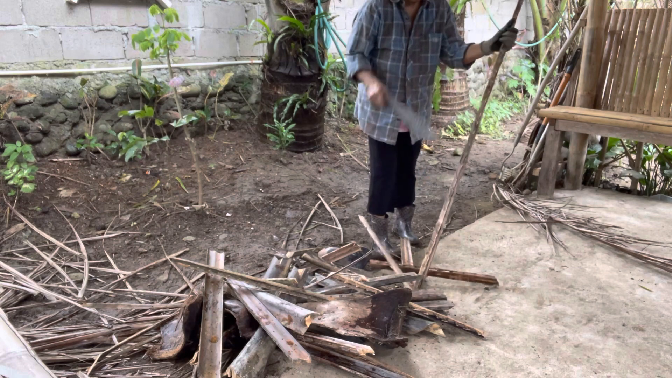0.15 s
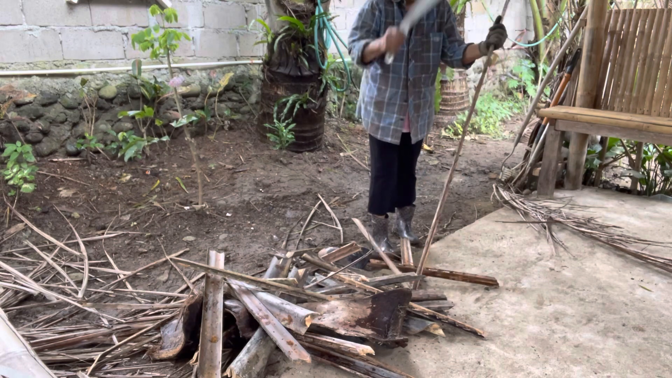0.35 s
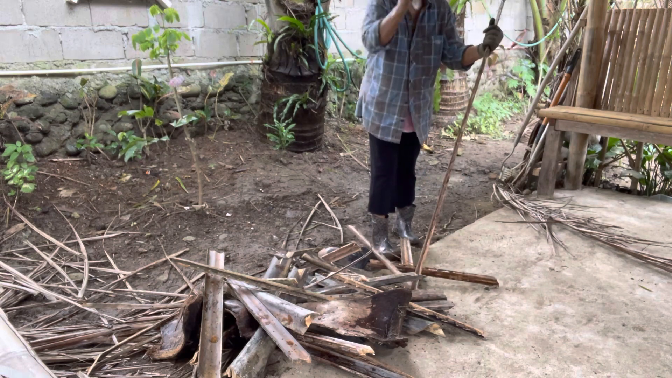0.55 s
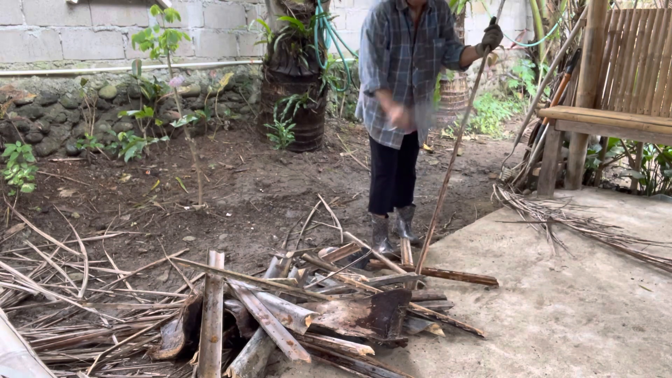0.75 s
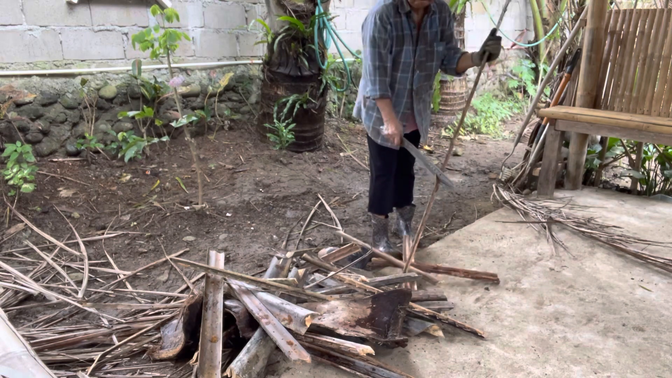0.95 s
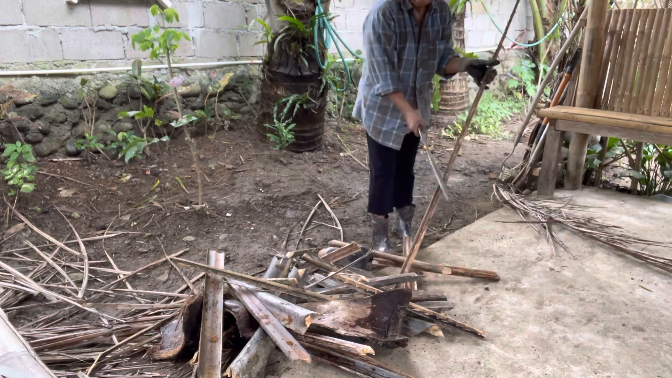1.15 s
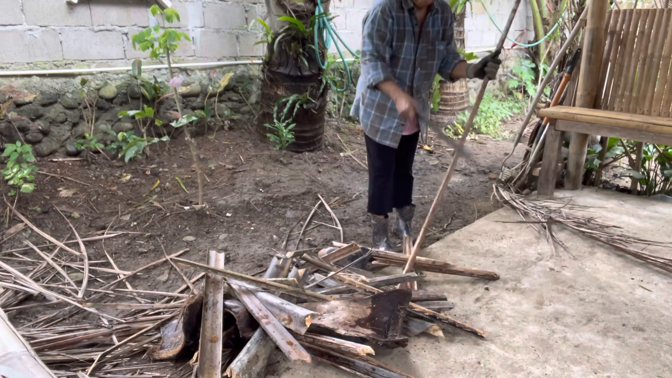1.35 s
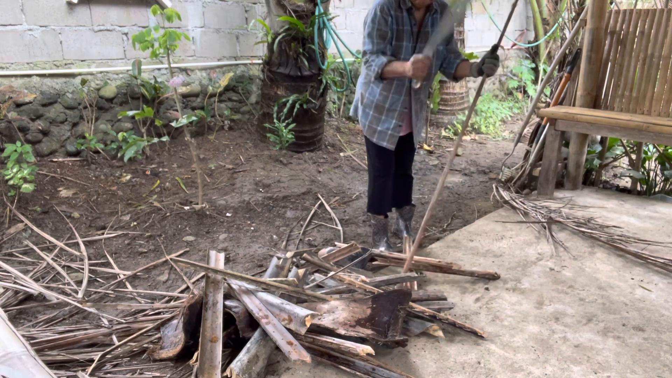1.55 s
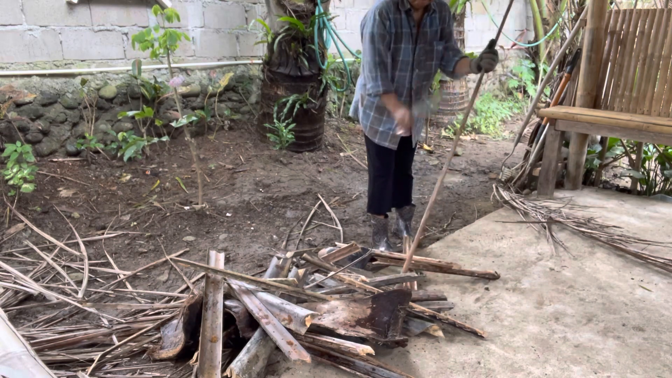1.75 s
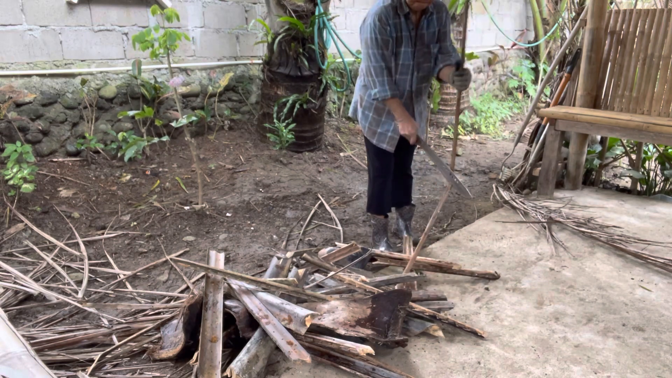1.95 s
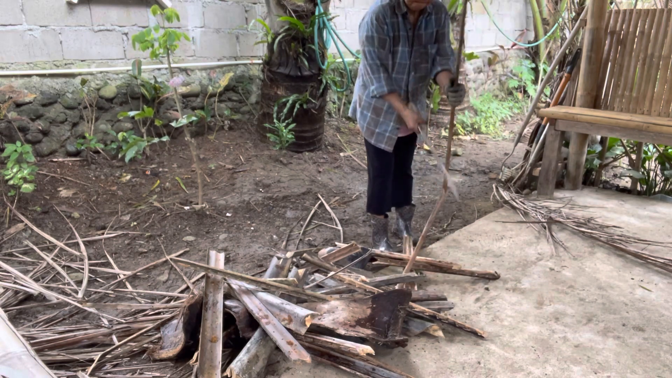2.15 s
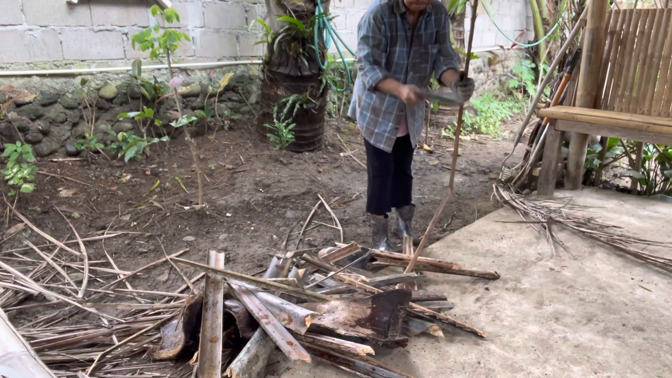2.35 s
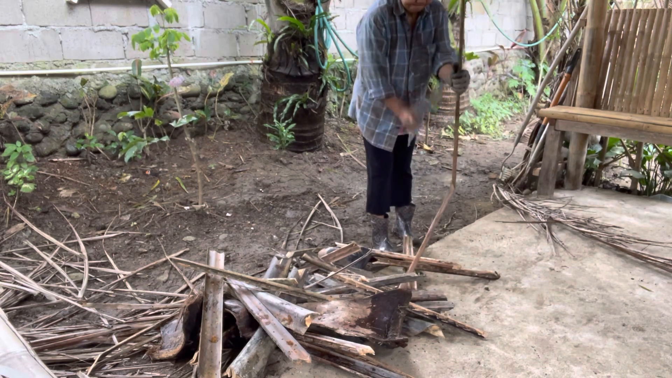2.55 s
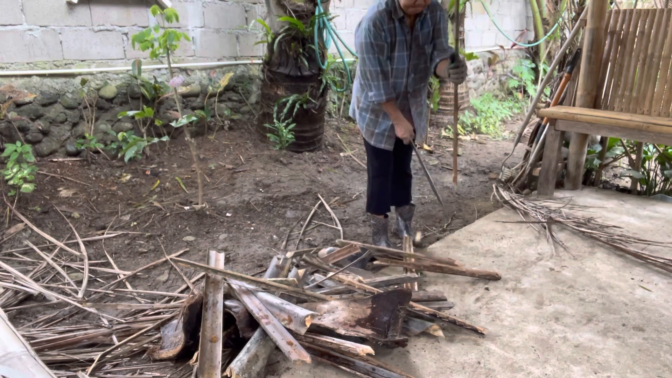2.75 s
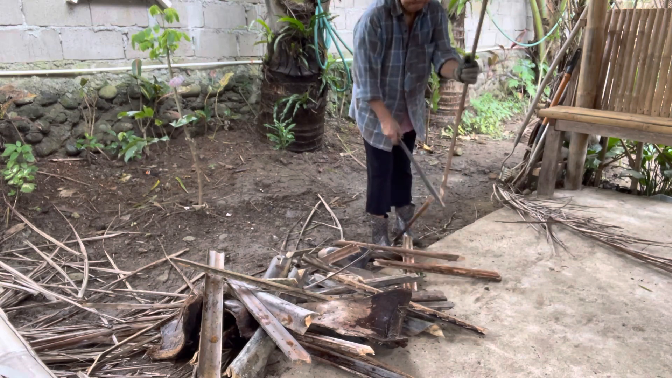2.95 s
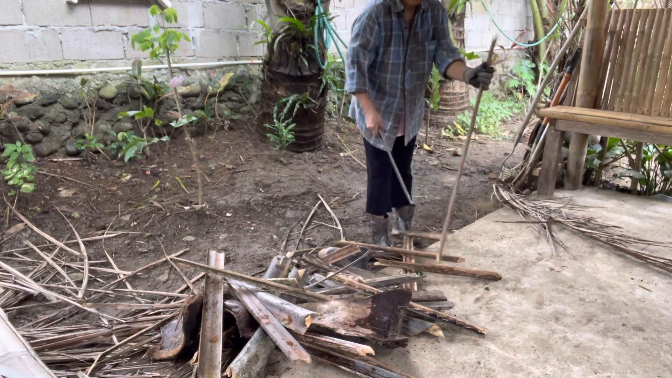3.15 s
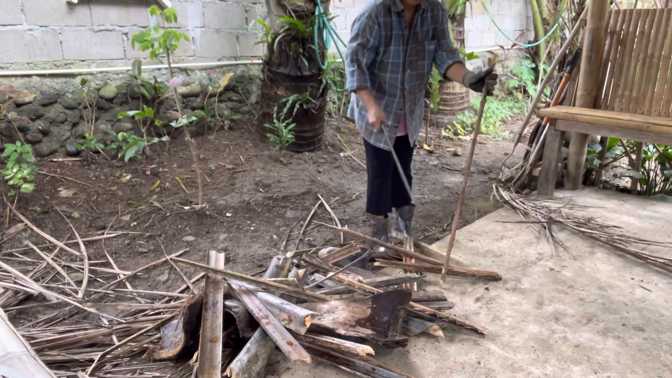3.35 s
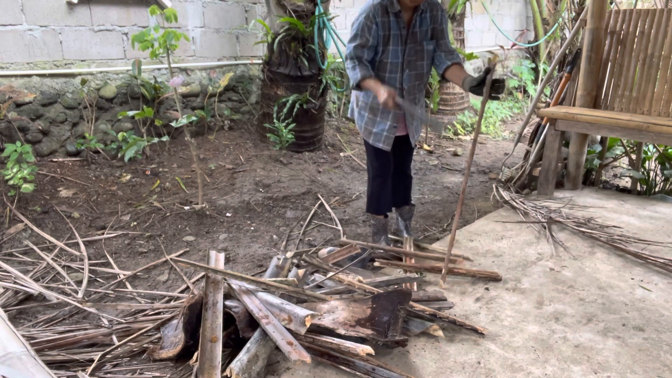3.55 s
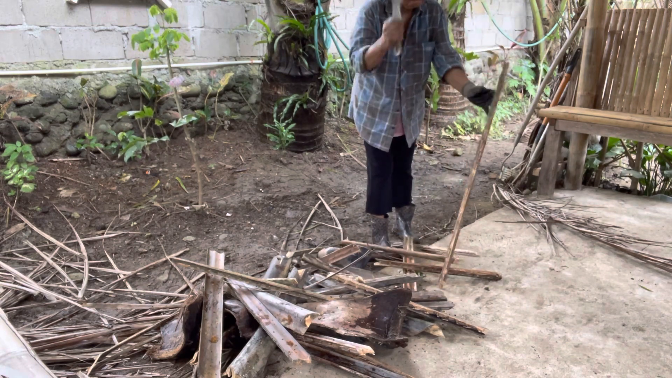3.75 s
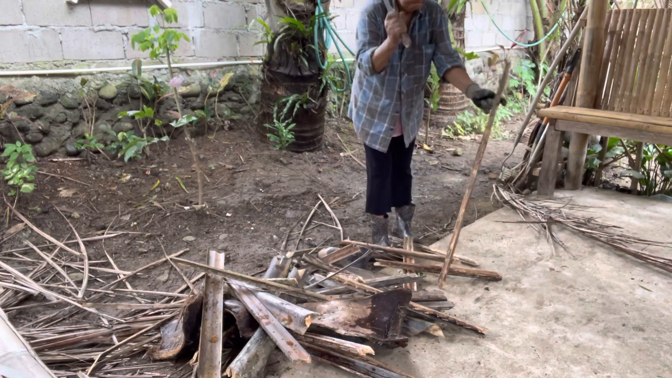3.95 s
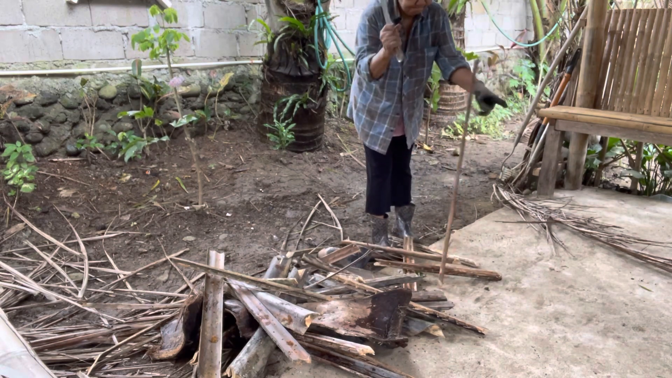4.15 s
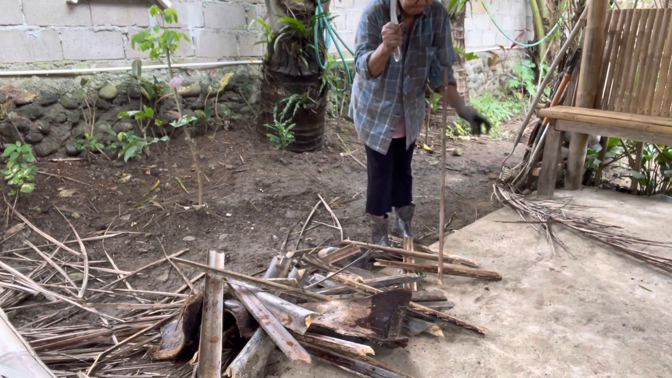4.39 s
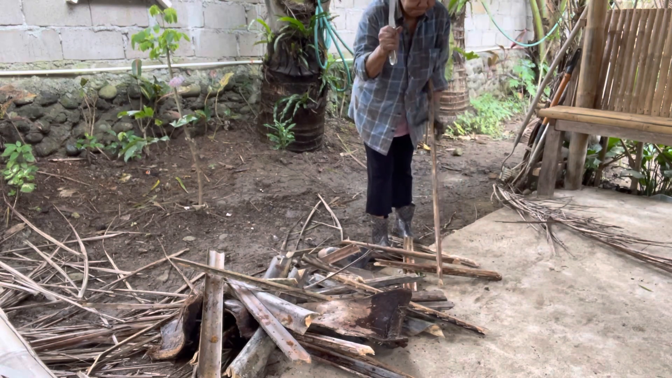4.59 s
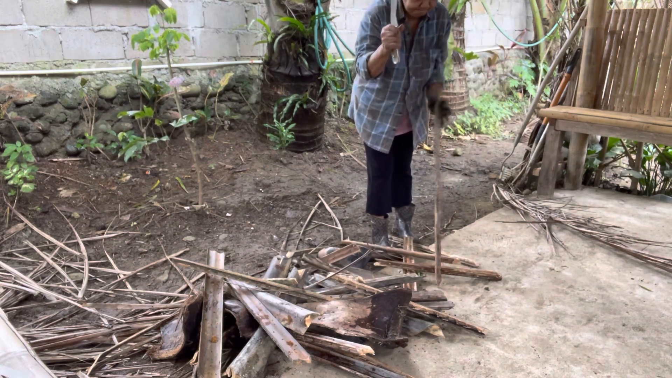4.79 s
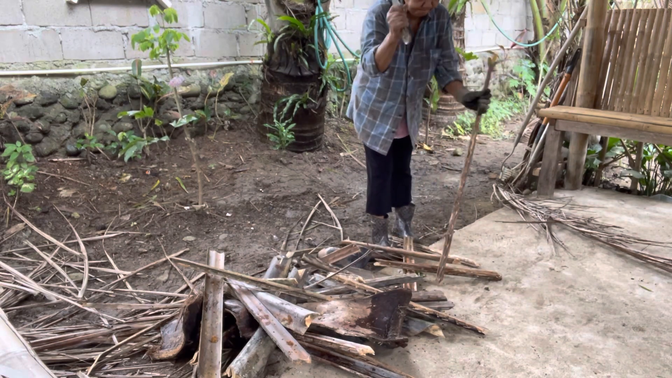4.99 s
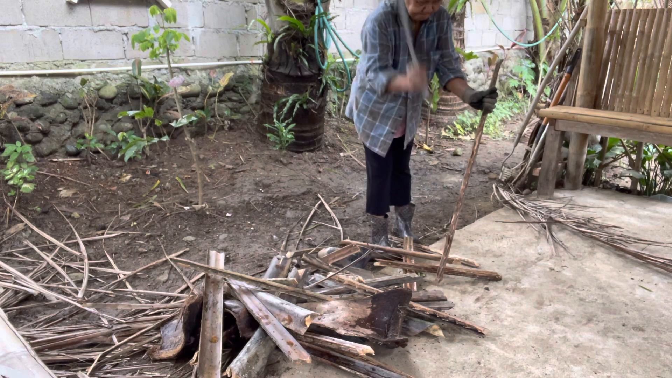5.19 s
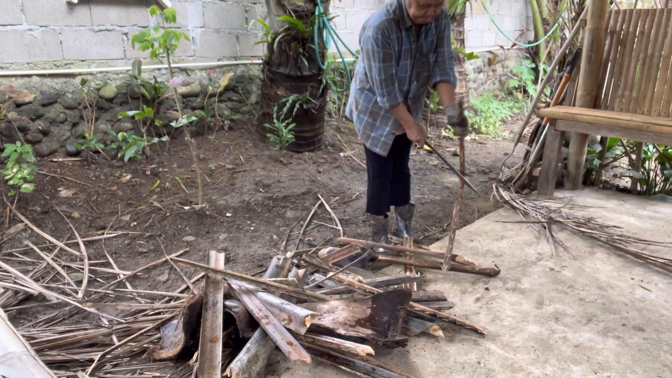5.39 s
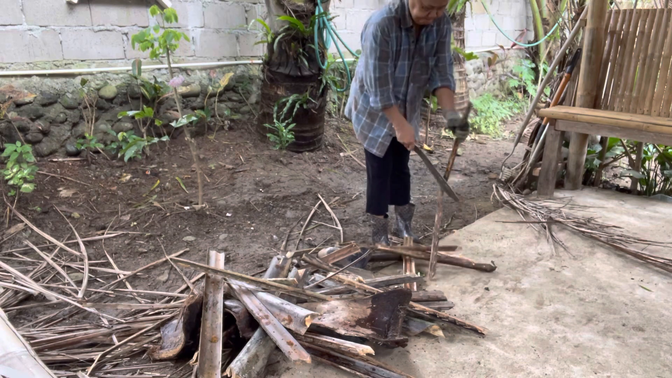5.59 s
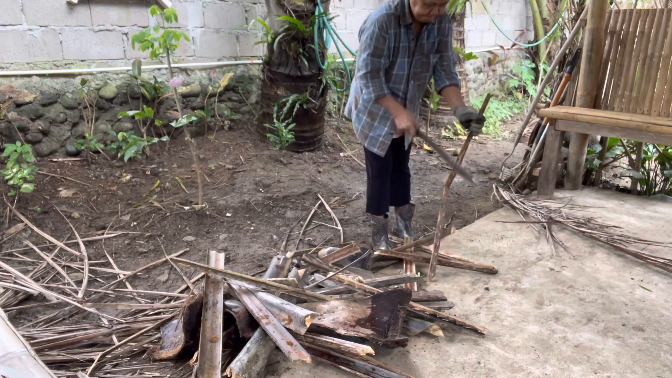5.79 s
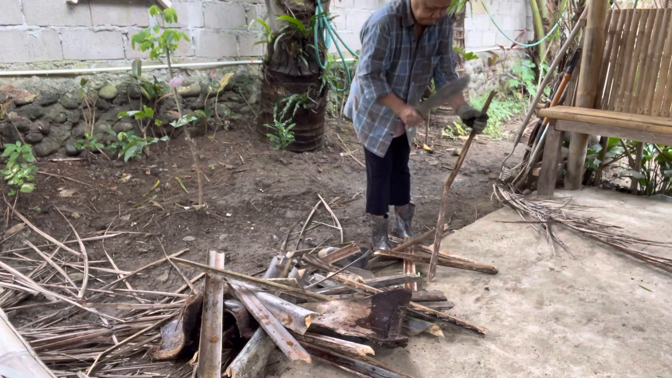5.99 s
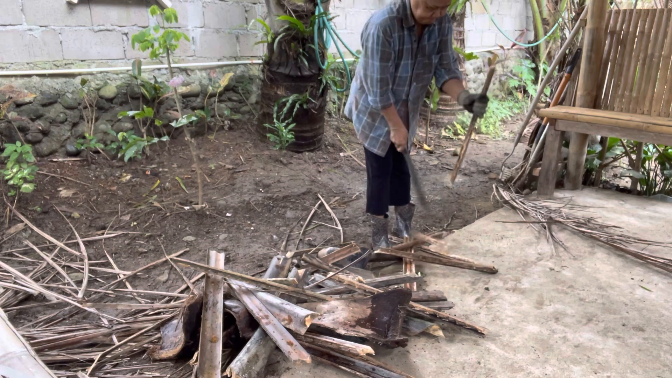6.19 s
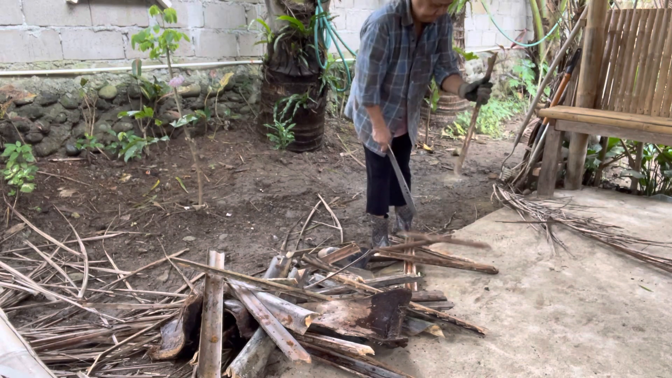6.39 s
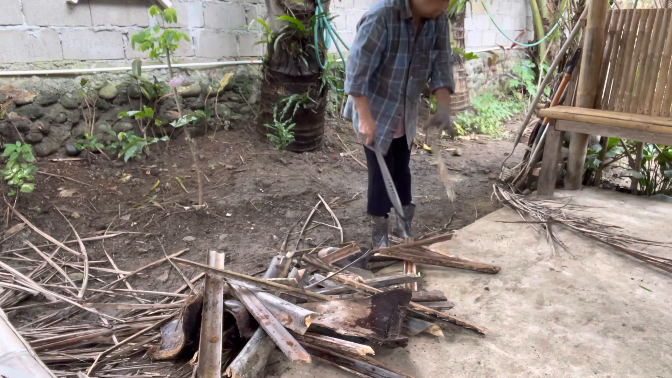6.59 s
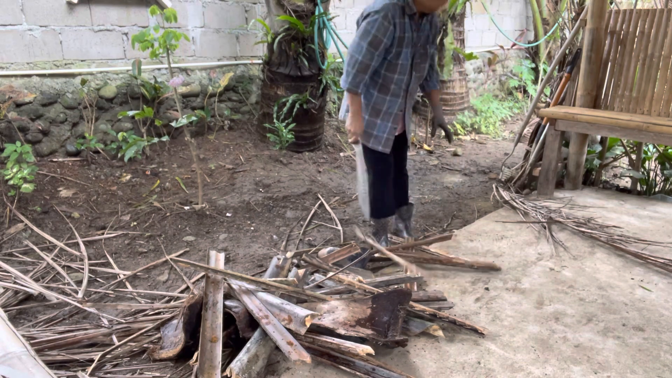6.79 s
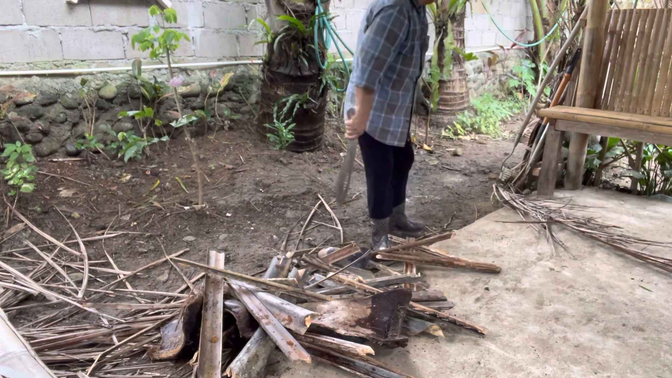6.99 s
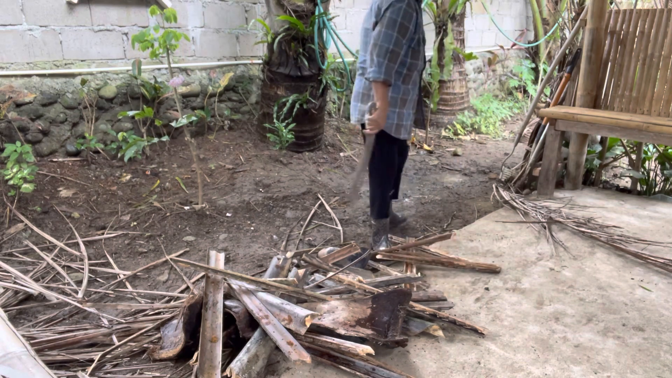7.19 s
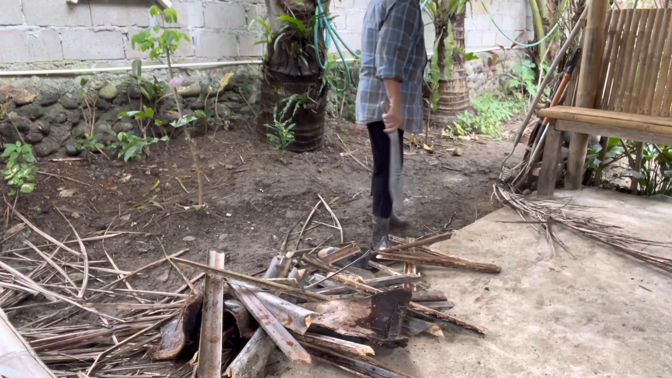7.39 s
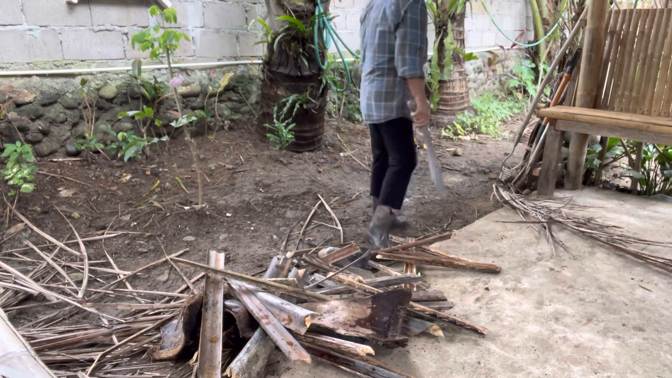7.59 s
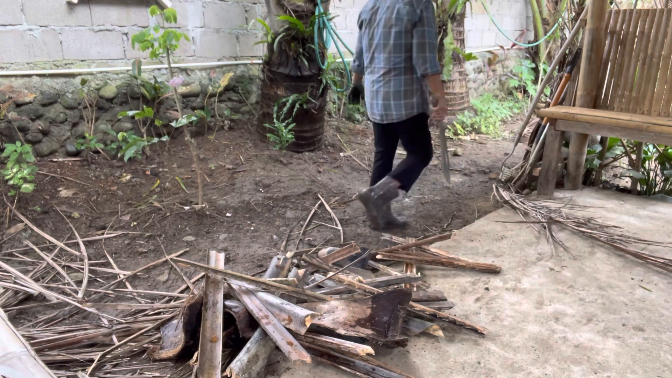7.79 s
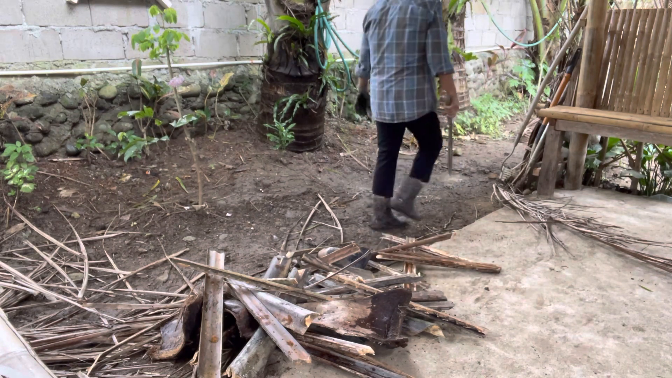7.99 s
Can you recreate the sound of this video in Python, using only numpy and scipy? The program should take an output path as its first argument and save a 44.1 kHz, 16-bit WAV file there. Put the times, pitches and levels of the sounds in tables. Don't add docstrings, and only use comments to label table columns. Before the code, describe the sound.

A walled yard outdoors, stereo, the work close and the dog far. Soft air, insect hiss and a low engine hum open the scene with one tiny twig tick. At 0.8 s a loud double blade blow cracks dry hollow stalks, with a woody knock and thud, then a stalk drags over grit at 1.0. Short hoarse barks echo from 1.45, 1.75, 2.05 and 2.35, with another chop at 1.8 and crackling to 2.0. At 2.65 a chop leaves a clear thin steel ring. Barks follow at 2.9, 3.4, 3.9 and 4.6 among light knocks, twig ticks and scuffs; a second engine briefly revs around 4.2. A strong splintering blow lands at 5.3, another at 6.15 with a dull ring, lighter knocks at 6.5 and 6.7-6.8 with a last ring. Scrapes fade, two barks come at 7.0 and 7.25, and a twig snaps at 7.3 before quiet air.

```python
import sys
import numpy as np
from scipy import signal
from scipy.fft import rfft, irfft, next_fast_len
from scipy.io import wavfile
from scipy.ndimage import uniform_filter1d

SR = 44100
rng = np.random.default_rng(int(sys.argv[2]) if len(sys.argv) > 2 else 0)


def decibels_to_gain(level_db):
    exponent = np.asarray(level_db, float) / 20
    return 10 ** exponent


def to_wav(sig):
    pcm = np.clip(np.atleast_2d(sig), -1, 1) * 32767
    pcm = np.round(pcm).astype(np.int16)
    wavfile.write(sys.argv[1], SR, pcm.T)


N = 354563

# frequency_hz, density_db_per_hz
AIR_MID = [(15, -37), (25, -15), (80, -2), (399, -10), (457, -14), (809, -14), (1010, -20), (1250, -21),
           (2750, -28.5), (4600, -33.5), (7110, -39), (8370, -28.5), (9330, -38.5), (14400, -49),
           (15300, -53), (16500, -73)]
AIR_SIDE = [(15, -51), (25, -11), (76, -3.5), (245, -10), (483, -5), (600, -5), (1250, -13.5),
            (2530, -22.5), (4860, -27), (6920, -28), (8140, -16.5), (10100, -37.5), (11000, -51),
            (15200, -40), (16500, -46)]
# time_s, level_db
TRAFFIC = [
    (0.0, -44),
    (0.8, -45.5),
    (1.1, -37.5),
    (1.5, -43.5),
    (2.2, -46),
    (5.0, -50.5),
    (6.6, -48),
    (8.04, -50.5),
]
HISS_DB, HISS_FOLLOWS = -48, 0.42

# time_s, pitch_hz, level_db
ENGINE = [(0.0, 64.0, -41), (0.38, 63.5, -35.5), (0.65, 66.5, -44), (1.05, 66.8, -37.5), (1.12, 64.5, -52),
          (1.36, 67.1, -38), (1.99, 69.3, -38), (2.19, 69.4, -49), (2.46, 69.3, -41), (3.24, 69.4, -51.5),
          (3.54, 66.8, -48.5), (3.8, 68, -67), (4.3, 65.5, -51), (5.4, 58.6, -61), (6.4, 59.2, -49.5),
          (7.54, 65.6, -48), (7.81, 67.5, -64), (8.04, 64.5, -47)]
# pitch_multiple, level_db
ENGINE_ORDERS = [(1.5, -1.5), (2., -8.5), (2.5, -11)]
OTHERS_DB, OTHERS_FADE_DB_PER_S = -51.5, -1.13
# time_s, pitch_hz, level_db
SECOND_ENGINE = [
    (3.75, 71.1, -45.5),
    (4.236, 74.3, -45),
    (4.39, 77.2, -75),
]

# start_s, length_s, effort_db, open_mouth_brightness_db_per_harmonic
BARKS = [(1.451, 0.097, -17, -0.5), (1.753, 0.14, -20.5, -3.5), (2.059, 0.12, -26, 1.5),
         (2.366, 0.14, -22, -3.5), (2.942, 0.1, -25.5, -2), (3.938, 0.11, -22.5, -2.5),
         (4.604, 0.132, -24.5, 1.5), (6.971, 0.11, -23.5, 1.1), (7.262, .14, -24, 1),
         (3.447, 0.13, -24, 3.5), (4.336, 0.052, -53.5, 8), (7.834, 0.11, -67, 11.5)]
MOMENTS = [0, .12, .25, .4, .55, .75, 1]
# pitch_hz, rising, sagging, then holding
BARK_PITCH = [(560, 635, 635, 575, 570, 590, 580), (560, 605, 590, 560, 585, 560, 570),
              (585, 630, 640, 620, 605, 600, 595), (540, 570, 575, 585, 595, 585, 580),
              (540, 565, 555, 560, 562, 580, 585), (520, 600, 640, 570, 583, 590, 583),
              (545, 605, 640, 580, 610, 630, 600), (530, 565, 610, 550, 580, 580, 575),
              (545, 600, 645, 595, 590, 600, 630), (500, 660, 735, 765, 680, 615, 575),
              (524, 430, 500, 560, 560, 560, 510), (534, 580, 560, 530, 560, 580, 540)]
BARK_EFFORT = [(5, -5, -1, 2.5, -1.5, -8.5, -1), (1, -6, -6, -2, 2, -6.5, 3),
               (11, 7, 1, -1.5, -4.5, -2, -0.5), (6, -1, -1, -1, 1, -9.5, -4.5),
               (9, -6.5, 2.5, 4, 1, 1, -12), (0, 0.5, 0.5, 2.5, -2.5, 0, -5),
               (12, -1.5, 1.5, 1.5, -0.5, -4.5, -1), (10, -1.5, -2, -0.5, -1, -0.5, -2),
               (6, -2, -1.5, 3.5, -2.5, 1.5, -2.5), (4, -10, 1, 5.5, -0.5, -4, -6),
               (-3, 1, -1, -1, -5, -6, -5), (2, 0.5, -1, -7, -7, 2, 1)]
BARK_MOUTH = [(-20, -15, -4, -2, -1, 1, 1), (-20, -5, 1.5, 3.5, 1, 0.82, -1),
              (-21, -17, 0.5, -1.5, -1.1, 1, 2.5), (-20, -14, 1, -4.5, -1, 1, 2.2),
              (-26, -6, -9, -2.5, 0.67, 1, 1), (-16, -17, -4, -4, 1, 0.95, 2),
              (-20, -6, -6, -2.5, 0.58, 1, 2), (-13, -16, -0.5, -2.5, 1, -0.83, 1.2),
              (-22, -11, -1, -1, 0.85, 0.78, 2.4), (-15, -4.5, -4.5, -9, 0.75, 1, 1.3),
              (-20, -5, -7, -3, 1, 1, 1), (-20, -3, 7, -8, 1, 1, 1)]
HOARSENESS = [0.33, 0.42, 0.34, 0.36, 0.24, 0.3, 0.42, 0.24, 0.27, 0.33, 0.11, 0.11]
# second_partial_lift_db, from the shape of the mouth
SECOND_PARTIAL = [-3, -2, -1.5, -2, 4.5, 5.5, -2.5, 3.5, 5, -5.5, -9, -2]
# in_between_partials_db, from uneven fold cycles in a broken voice
BROKEN_PARTIALS = [-19, -22, -28, 1.5, -3.5, 0, -2, -32, -13, -12, -32, -28]
# frequency_hz, level_db
THROAT = [(300, -42), (430, -36), (520, 2.5), (585, -1), (760, -8), (1000, -6.5), (1190, -3), (1450, -4),
          (1750, -7.5), (2350, -15.5), (3000, -21.5), (3500, -48.5), (5000, -67)]
# frequency_hz, level_db
BREATH = [(400, -46), (480, 2.5), (600, 5), (800, 1.5), (1050, 5.5), (1400, 4.5), (1800, -8), (2400, -11),
          (3000, -32), (3500, -73), (5000, -40)]
OPEN_AT, BREAK_AT, CLEAR = 0.67, 0.71, 0.41
CATCH_AT, CATCH_WIDTH, CATCH = .28, .06, .6
WAVER, THROB_DB = 0.012, 3
SMEAR_TURNS = .07

# start_s, swell_s, fade_s, peak_db, brightness_db_per_octave
SCRAPES = [
    (1.042, 0.029, 0.32, -32.5, -1),
    (3.079, 0.15, 0.13, -49, 9),
    (4.62, .25, 0.062, -59, 9),
    (3.395, 0.006, 0.075, -50, -3),
    (5.42, 0.11, 0.13, -51.5, 4.5),
    (6.359, 0.18, 0.22, -62, 10),
    (6.8, .015, 0.54, -53, -2),
    (7.276, 0.018, 0.32, -50.5, 5.5),
]
# frequency_hz, density_db_per_hz
GRIT = [(120, -40.5), (200, -6.5), (2090, -10.5), (2330, -8), (6170, -11.5), (7270, -19), (10700, -22.5),
        (13800, -33), (16000, -62)]
SWELL_DB, FADE_DB, DULLING_DB = -15, -22.5, -5

# start_s, level_db, tilt_db_per_octave, ring_length_factor
RINGS = [
    (2.64, -42.5, 7.5, 1.26),
    (2.945, -62, 8.5, 0.99),
    (5.66, -72, 5.5, 1.6),
    (6.159, -40, -23, 1.48),
    (6.713, -38.5, -4, 1.3),
]
# frequency_hz, level_db, t60_s
BLADE = [(4062, 0, .42), (4085, -5, .35), (5390, -8, .4), (5420, -14, .3), (6590, -7, .25), (7590, -2, .12),
         (8590, -5, .2), (11090, 0, .2), (10990, -4, .15), (12830, -14, .12), (14600, -9, .15)]

# start_s, knock_db, knock_hz, thud_db, thud_hz
KNOCKS = [(0.797, -8, 780, -15, 215), (0.8014, -3.5, 784, -18, 253), (1.042, -26, 890, -31.5, 359),
          (1.815, -15.5, 610, -13, 225), (2.635, -28, 925, -35, 185), (2.643, -17.5, 895, -34.5, 356),
          (2.719, -23, 812, -32.5, 313), (3.232, -24.5, 822, -24, 223), (3.33, -33, 696, -42, 224),
          (5.318, -13, 780, -26, 280), (5.325, -24, 754, -18.5, 158), (5.328, -51, 400, -18, 72),
          (6.14, -27, 760, -43, 232), (6.185, -21, 848, -31, 305), (6.48, -27.5, 847, -52, 268),
          (6.54, -34, 745, -70, 121), (6.714, -29.5, 1140, -57, 120), (6.786, -29, 665, -30, 246),
          (6.829, -23, 783, -30.5, 285)]
# pitch_ratio, level_db, t60_s
STALK = [(1.001, -2, 0.02), (1.3, 0, 0.0067), (1.76, -11.5, 0.0095), (2.45, -20, 0.0093),
         (0.795, -8, 0.014), (0.459, -18, 0.081)]
# pitch_ratio, level_db, t60_s
PILE = [(1.016, 3, 0.056), (0.17, -29, 0.044), (1.477, -8.5, 0.08)]

# start_s, splinter_db,
# snap_db, splinter_t60_s, thinness_db_per_octave
CHOPS = [(0.7937, -10, -25, 0.28, -5), (0.802, -4.5, -19.5, 0.2, -4.5), (0.924, -33, -26.5, 0.6, -10),
         (1.809, -9, -19.5, 0.27, -3), (1.898, -24, -52, 0.071, 10), (1.939, -29.5, -39, 1, 1),
         (1.99, -13.5, -34, 0.13, -2.5), (2.636, -15, -27, 0.33, -5.5), (2.6447, -11, -22.5, 0.24, -3),
         (2.72, -22.5, -40, 0.21, -11), (2.943, -30, -57, 0.33, -1), (5.318, -8, -30, 0.18, 3),
         (5.3231, -4.5, -53, 0.22, -5.5), (6.139, -18, -47, 0.15, -9), (6.1445, -8.5, -41, 0.24, -6),
         (6.184, -46, -31, 0.13, -3), (6.48, -30.5, -30, 0.12, -4), (6.714, -21.5, -18.5, 0.032, -5.5),
         (6.7855, -21, -29.5, 0.02, -1), (6.829, -37, -29, 0.15, 7)]
# start_s, splinter_db, snap_db
TWIGS = [(0.5016, -43.5, -64), (1.042, -54, -30), (1.2637, -59, -46), (1.641, -71, -40),
         (2.126, -37.5, -49), (2.162, -36.5, -56), (2.281, -36, -46), (2.468, -36, -78), (2.622, -40, -48),
         (2.7408, -38, -40), (2.8877, -39, -76), (3.2303, -35, -36.5), (3.3313, -47.5, -36),
         (3.841, -31, -73), (4.297, -50, -75), (5.313, -25, -30), (5.482, -32.5, -67), (5.552, -31.5, -63),
         (5.9818, -58, -73), (6.425, -44.5, -66), (6.54, -44, -36.5), (6.9457, -45, -56),
         (7.2908, -43, -29.5)]
# start_s, splinter_db, snap_db
TICKS = [(0.8071, -3.5, -35), (0.821, -22, -41), (1.0475, -43, -45), (1.054, -44, -43), (1.0665, -42, -47),
         (1.8215, -13, -37), (1.905, -20, -50), (1.9645, -33, -55), (1.979, -25, -55), (1.997, -16.5, -45),
         (2.6457, -5, -30), (2.738, -24.5, -50), (5.364, -15, -42), (6.145, -4, -32), (6.151, -17, -29),
         (6.187, -20, -45), (5.629, -44, -65), (2.6212, -30, -50)]
TWIG_T60_S, TWIG_THIN_DB = 0.13, 2
TICK_T60_S, TICK_THIN_DB = 0.028, -5.5
# frequency_hz, density_db_per_hz
SPLINTER = [(1470, -17.5), (2500, -6), (3710, -3.5), (6350, 1), (7430, 2.5), (9950, 5.5), (13200, -4.5),
            (15400, -0.5), (16100, -13), (16900, -36)]
# frequency_hz, level_db, t60_s
WOOD = [(1344, 0, 0.011), (1570, -19, 0.01), (1820, -4.5, 0.016), (2150, 3.5, 0.0084), (2290, -1.5, 0.016),
        (2700, -5.5, 0.021), (3160, -3.5, 0.0082)]
GRAIN_DB = 3.0
GROUND_S, GROUND_SHARE = .00016, 0.31

# frequency_hz, t60_s
YARD = [(200, 0.68), (600, 1), (1200, 0.73), (1800, 0.76), (3000, 1), (8000, 0.43), (15000, 0.81)]
# frequency_hz, level_db
WALL_TONE = [(150, 4.5), (500, 2)]
# frequency_hz, level_db
LOW_CUT = [(30, -31), (70, 5.5), (140, -1)]
# frequency_hz, left_lead_radians
PORT_PHASE = [(100, 4), (340, 1.95), (700, -1.45), (1800, -2), (4500, -2.5), (8000, -3), (10500, -0.5),
              (16000, 2.5)]
# frequency_hz, left_minus_right_db
DOG_BALANCE = [(60, -41), (180, -16), (550, 3.5), (1650, 14), (4970, 2), (15000, -3)]
# frequency_hz, mid_db
MID_GAIN = [(6500, -0.64), (7050, -1), (7250, -8), (7400, -3), (7600, -1), (8000, -2), (15000, 3),
            (15900, 0), (16500, -13)]
# frequency_hz, side_db
SIDE_GAIN = [(60, -30), (200, -18), (500, 1.5), (9500, 0), (11000, 4), (13000, -19), (14500, 0)]
# frequency_hz, level_db
TOP_CUT = [(16600, 0), (16950, -30), (17050, -80)]


def evened(x):
    return x / np.sqrt(np.mean(x ** 2) + 1e-20)


def read(points, hz):
    f, value = np.transpose(points)
    return np.interp(np.log(hz + 1), np.log(f + 1), value)


def add(mix, s, sound):
    part = mix[round(s * SR):][:len(sound)]
    part += sound[:len(part)]


def coloured(x, points, factor=1):
    size = next_fast_len(x.shape[-1] + 2048)
    hz = np.fft.rfftfreq(size, 1 / SR)
    return irfft(rfft(x, size) * decibels_to_gain(factor * read(points, hz)), size)[..., :x.shape[-1]]


def curves(rows):
    s, *columns = np.transpose(rows)
    t = np.arange(s[0], s[-1], 1 / SR)
    return s[0], [np.interp(t, s, c) for c in columns]


def ring(modes, spread, hz=1, length=0.68):
    t = np.arange(round(length * SR)) / SR
    detune = hz * (1 + spread * rng.uniform(-0.17, 1, len(modes)))
    out = 0
    for (f, db, t60), d in zip(modes, detune):
        out = out + decibels_to_gain(db - 60 * t / t60) * np.sin(2 * np.pi * f * d * t)
    return out


def crackle(size, per_s, uneven_db, wash):
    snaps = decibels_to_gain(uneven_db * np.minimum(rng.exponential(1, size), 3))
    snaps = snaps * (rng.random(size) < per_s / SR)
    return evened(snaps * rng.choice([-1., 1.], size)) + wash * rng.standard_normal(size)


def yard(x, gap_s, speed, early_db, early_s):
    taps = np.zeros((2, SR))
    places = np.arange(round(gap_s * SR), SR - 20, 20)
    at = places + rng.integers(0, 20, (2, len(places)))
    np.put_along_axis(taps, at, rng.choice([-1., 1.], at.shape), 1)
    hz, t, z = signal.stft(taps, SR, nperseg=256)
    early = early_db / (1 + (t / early_s) ** 4)
    decay_db = early - 60 * speed * t / read(YARD, hz)[:, None]
    tail = signal.istft(z * decibels_to_gain(decay_db), SR, nperseg=256)[1]
    tail = tail / np.linalg.norm(tail, axis=1)[:, None]
    return signal.fftconvolve(x[None], tail, axes=1)[:, :N]


def ports(x, factor):
    size = next_fast_len(N + 2048)
    phase = factor * read(PORT_PHASE, np.fft.rfftfreq(size, 1 / SR)) / 2
    pair = irfft(rfft(x, size) * np.exp(1j * np.outer([1, -1], phase)), size)
    return pair[:, :N]


def air():
    frames, hz = N // 256 + 5, np.fft.rfftfreq(1024, 1 / SR)
    a, b, patches = rng.standard_normal((frames, 513, 2, 3)).T
    patches = evened(uniform_filter1d(uniform_filter1d(patches[0], 14, 0), 12, 1))
    t = np.arange(frames) * 256 / SR
    rumble_db = np.interp(t, *np.transpose(TRAFFIC))
    hiss_db = HISS_DB + HISS_FOLLOWS * (rumble_db + 51)
    low_share = 1 / (1 + (hz[:, None] / 1500) ** 2)
    level_db = low_share * rumble_db + (1 - low_share) * hiss_db
    colour_db = np.array([read(AIR_MID, hz), read(AIR_SIDE, hz) - 7.0])[:, :, None]
    z = (a + 1j * b) * decibels_to_gain(colour_db + level_db + 2.0 * patches - 5.5)
    return signal.istft(z, nperseg=1024, noverlap=768)[1][:, :N]


def engines():
    out = np.zeros(N)
    s, (hz, db) = curves(ENGINE)
    others_db = OTHERS_DB + OTHERS_FADE_DB_PER_S * np.arange(len(hz)) / SR
    turns = np.cumsum(hz) / SR
    orders = sum(decibels_to_gain(order_db) * np.sin(2 * np.pi * k * turns) for k, order_db in ENGINE_ORDERS)
    add(out, s, np.sqrt(2) * (decibels_to_gain(db) * np.sin(2 * np.pi * turns) + decibels_to_gain(others_db) * orders))
    s, (hz, db) = curves(SECOND_ENGINE)
    passing = np.sqrt(2) * decibels_to_gain(db) * np.sin(2 * np.pi * np.cumsum(hz) / SR)
    add(out, s, passing * signal.windows.tukey(len(hz), .2))
    return out


def bark(length, effort_db, open_db, hoarse, second_db, half_db, pitch, effort, mouth):
    u = np.arange(0, length, 1 / SR) / length
    hz = np.interp(u, MOMENTS, pitch)
    effort_db = effort_db + np.interp(u, MOMENTS, effort)
    bright_db = open_db + np.interp(u, MOMENTS, mouth)
    broken_db = half_db + np.interp(u, [OPEN_AT, BREAK_AT], [-30, 0])
    catch = CATCH * np.exp(-((u - CATCH_AT) / CATCH_WIDTH) ** 2)
    rough = np.clip(hoarse, 0, 1) * (np.interp(u, [OPEN_AT, BREAK_AT], [CLEAR, 1]) + catch)

    chance = rng.standard_normal((2, SR // 5))[:, :len(u)]
    wobble = evened(uniform_filter1d(chance[0], 150))
    waver = evened(uniform_filter1d(uniform_filter1d(chance[0], 500), 300))
    smear = evened(uniform_filter1d(uniform_filter1d(chance[1], 250), 150))
    effort_db = effort_db + THROB_DB * np.clip(np.roll(waver, 900), -2.5, 1.2)
    hz = uniform_filter1d(hz, 300, mode="nearest") * (1 + 0.054 * rough * wobble + WAVER * waver)
    turns = np.cumsum(hz) / SR

    folds = 0
    for k in [1, 1.65, 2, 2.65, 3, 3.3, 4, 4.3, 5, 6]:
        flicker = np.roll(uniform_filter1d(wobble, 300), round(700 * k))
        level_db = read(THROAT, k * hz) + bright_db * min(k - 1, 1.5)
        level_db = level_db + second_db * (k == 2) + broken_db * (k % 1 > 0)
        level_db = level_db + 10.0 * rough * np.sqrt(k - .8) * flicker
        wander = SMEAR_TURNS * max(k - 1.7, 0) * np.roll(smear, round(900 * k))
        folds = folds + decibels_to_gain(level_db) * np.cos(2 * np.pi * (k * turns + wander))
    puffs = coloured((0.2 + np.exp(-(turns % 1) / 0.3)) * chance[1], BREATH)
    voice = (1 - rough) * folds + rough * evened(puffs) * decibels_to_gain(bright_db - 2.5)
    return decibels_to_gain(effort_db) * voice * signal.windows.tukey(len(hz), .3)


def dog():
    out = np.zeros(N)
    voices = zip(BARKS, HOARSENESS, SECOND_PARTIAL, BROKEN_PARTIALS, BARK_PITCH, BARK_EFFORT, BARK_MOUTH)
    for (s, *delivery), *voice in voices:
        add(out, s, bark(*delivery, *voice))
    return out


def scrapes():
    out, t = np.zeros(N), np.arange(round(.6 * SR)) / SR
    split = signal.butter(2, 3500, fs=SR, output="sos")
    for s, swell_s, fade_s, peak_db, bright_db in SCRAPES:
        fading = np.maximum(t - swell_s, 0) / fade_s
        level_db = peak_db + SWELL_DB * np.maximum(1 - t / swell_s, 0) + FADE_DB * fading
        colour = [(hz, db + bright_db * np.log2(max(hz / 3500, 1))) for hz, db in GRIT]
        grit = coloured(crackle(len(t), 2500, 4.4, 0.88), colour)
        low = signal.sosfilt(split, grit)
        high = grit - low
        low_gain = decibels_to_gain(-bright_db - DULLING_DB * np.minimum(fading, 1))
        add(out, s, decibels_to_gain(level_db) * (high + low * low_gain) / np.std(high))
    return out


def blade():
    out = np.zeros(N)
    for s, db, tilt_db, longer in RINGS:
        struck = [(hz, mode_db + tilt_db * np.log2(hz / 4000), t60 * longer) for hz, mode_db, t60 in BLADE]
        add(out, s, decibels_to_gain(db) * ring(struck, 0.001))
    return out


def knocks():
    out = np.zeros(N)
    for s, knock_db, knock_hz, thud_db, thud_hz in KNOCKS:
        jolts = np.zeros(400)
        jolts[rng.integers(0, 400, 3)] = rng.uniform(-1, 1, 3) * [.5, .4, .3]
        jolts[0] = 1
        knock = signal.oaconvolve(ring(STALK, 0.016, knock_hz, .2), jolts)
        rise = 1 - np.exp(-np.arange(len(knock)) / (0.0014 * SR))
        add(out, s, decibels_to_gain(knock_db + 5.0) * knock * rise)
        add(out, s, decibels_to_gain(thud_db + 2.5) * ring(PILE, 0.028, thud_hz, .3))
    return out


def blows():
    out, t = np.zeros(N), np.arange(round(.33 * SR)) / SR
    crack = 4.5 * (t == 0)
    twigs = [(*twig, TWIG_T60_S, TWIG_THIN_DB) for twig in TWIGS]
    ticks = [(*tick, TICK_T60_S, TICK_THIN_DB) for tick in TICKS]
    for s, splinter_db, snap_db, t60, thin_db in CHOPS + twigs + ticks:
        tearing = decibels_to_gain(-60 * t / np.clip(t60, .02, .6)) + 0.78 * decibels_to_gain(-60 * t / 0.01)
        colour = [(hz, db + thin_db * np.log2(hz / 9000)) for hz, db in SPLINTER]
        grain = list(zip(np.geomspace(1500, 16000, 24), GRAIN_DB * rng.standard_normal(24)))
        splinter = evened(coloured(crackle(len(t), 6000, 4, 1.0) + crack, colour))
        splinter = coloured(splinter, grain)
        splinter = splinter + GROUND_SHARE * np.roll(splinter, round(GROUND_S * SR))
        wood = ring(WOOD, 0.08, length=0.026)
        snap = evened(signal.oaconvolve(crackle(len(t), 1500, 1.0, 1.0) + crack, wood)[:len(t)])
        add(out, s, (decibels_to_gain(splinter_db - 15.0) * splinter + decibels_to_gain(snap_db - 10.5) * snap) * tearing)
    return out


def scene():
    air_mid, air_side = air()
    barks = dog()
    far = ports(barks, 0.99) * decibels_to_gain(-1.5) + decibels_to_gain(-5.0) * yard(barks, .012, 0.76, 12.15, 0.059)
    far = np.array([coloured(far[0], DOG_BALANCE, 0.058), coloured(far[1], DOG_BALANCE, -0.23)])
    far = far * decibels_to_gain([[-1.4], [1.4]])
    work = coloured(blows() + knocks() + scrapes(), LOW_CUT)
    near = ports(work, 0.72) + ports(blade(), 0.61)
    near = near + decibels_to_gain(-9.5) * yard(coloured(work, WALL_TONE), .003, 2.8, 10.0, 0.053)
    left, right = near + far
    mid = coloured((left + right) / 2 + air_mid, MID_GAIN)
    side = coloured((left - right) / 2, SIDE_GAIN) + air_side
    return np.array([mid + side, mid - side]) + engines() * decibels_to_gain([[-.6], [.6]])


def roll_off(x):
    return signal.sosfilt(signal.butter(12, 16970, fs=SR, output="sos"), x)


def record(dry):
    ceiling = .92
    mix = coloured(ceiling * np.tanh(1.18 * dry / ceiling), TOP_CUT)
    return roll_off(mix)


dry = scene()
out = record(dry)
to_wav(out)
```